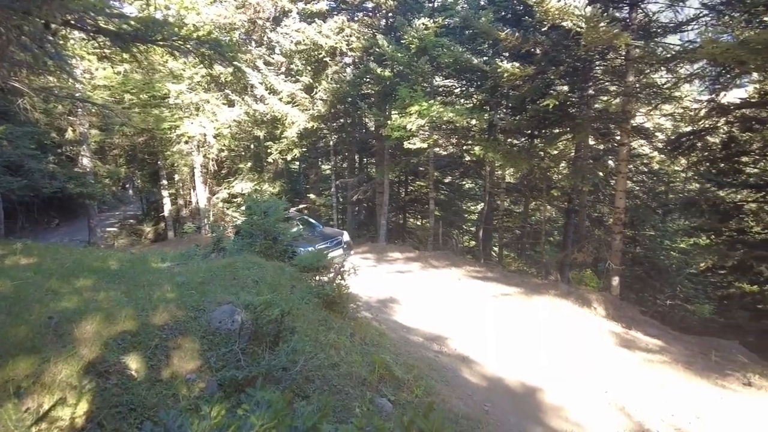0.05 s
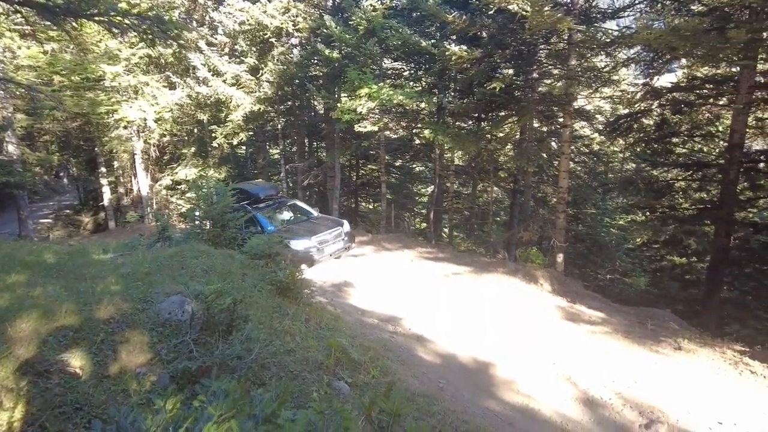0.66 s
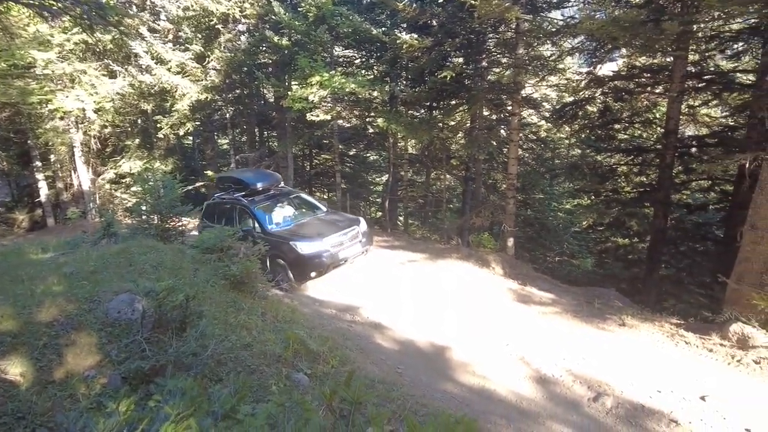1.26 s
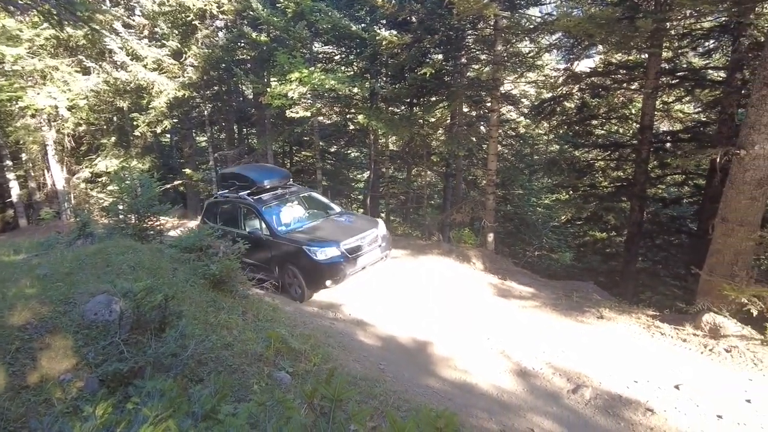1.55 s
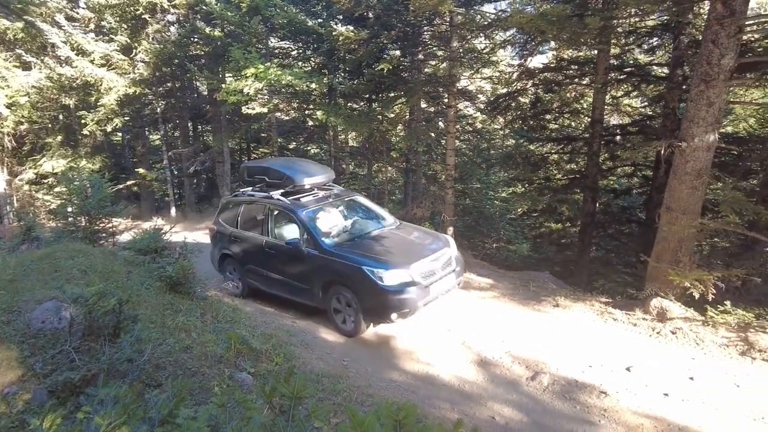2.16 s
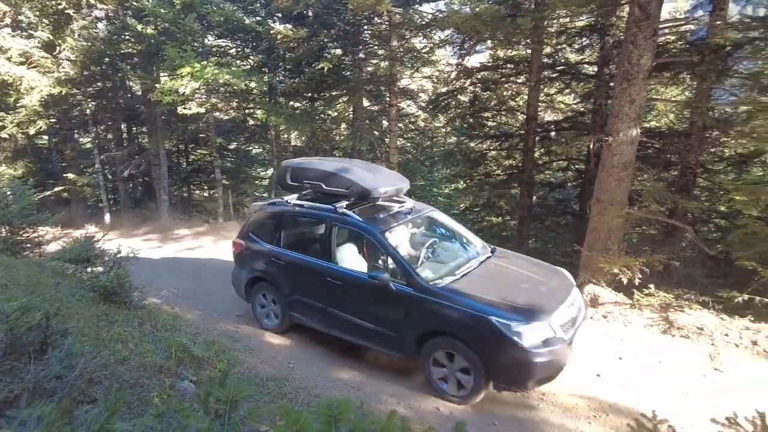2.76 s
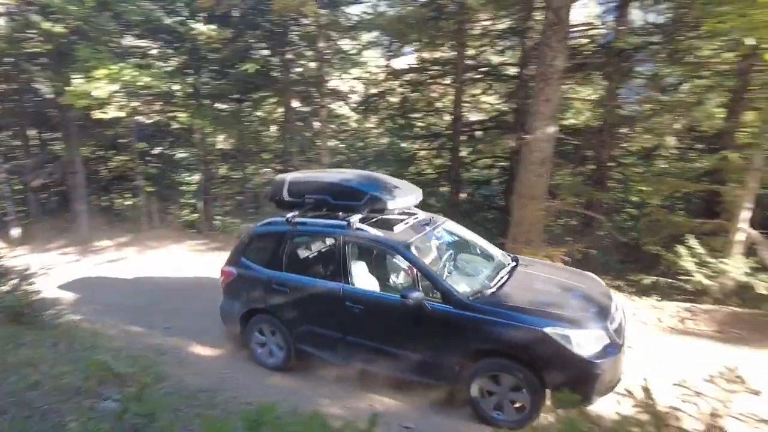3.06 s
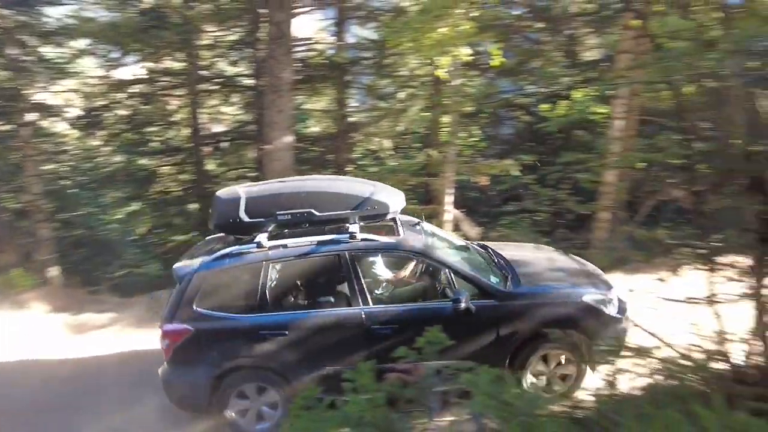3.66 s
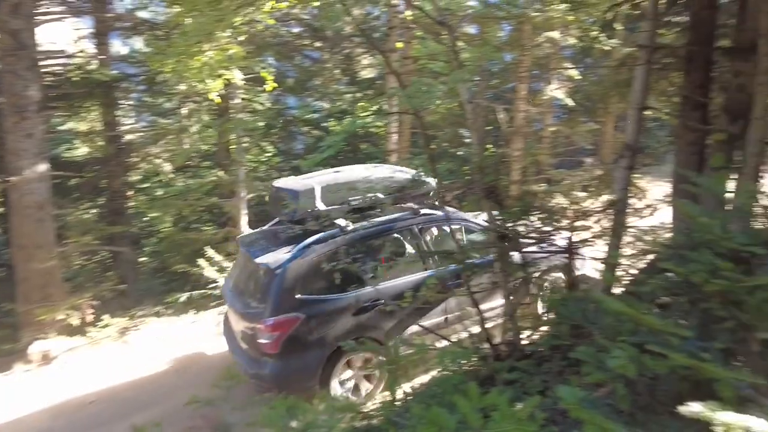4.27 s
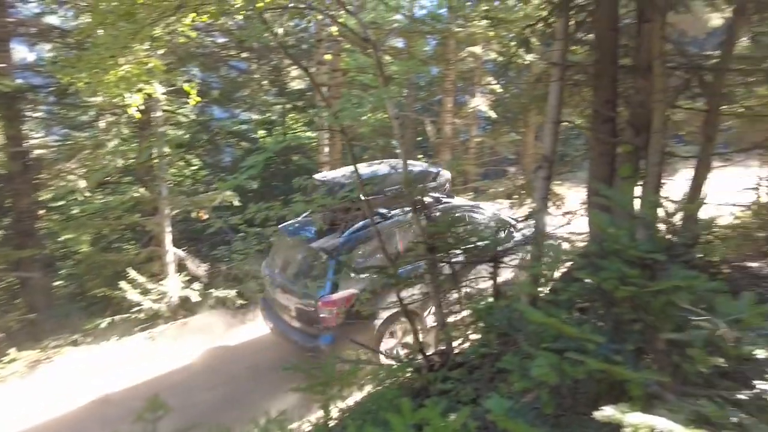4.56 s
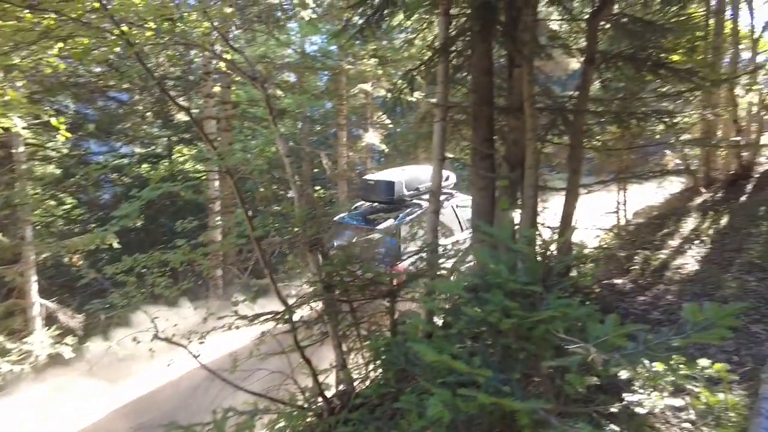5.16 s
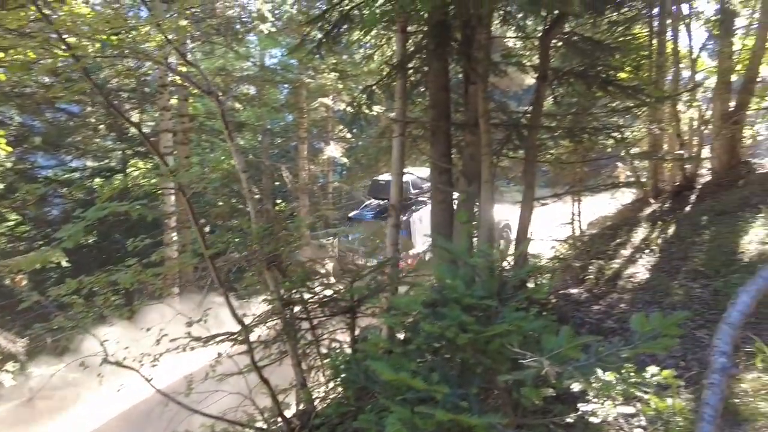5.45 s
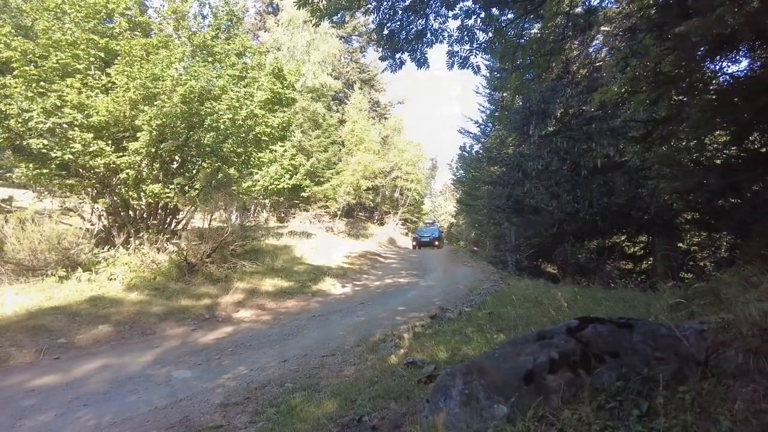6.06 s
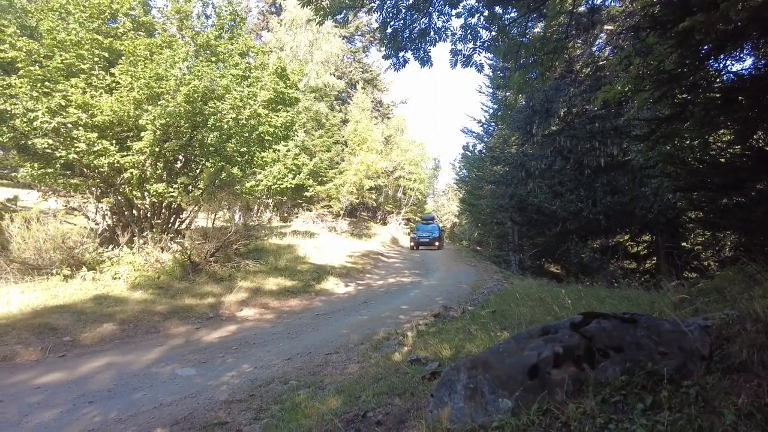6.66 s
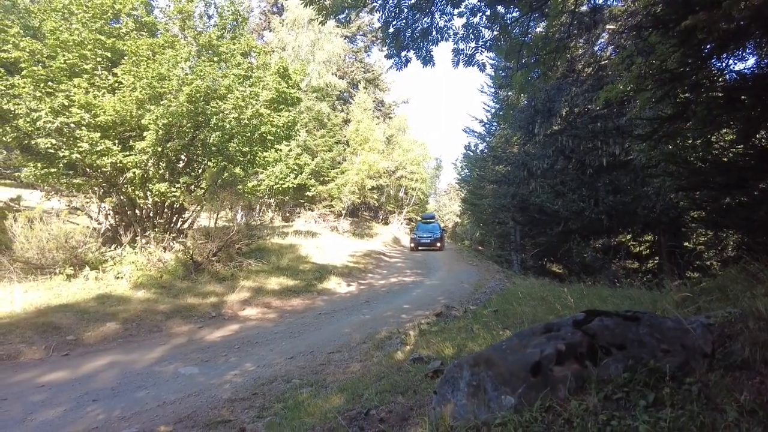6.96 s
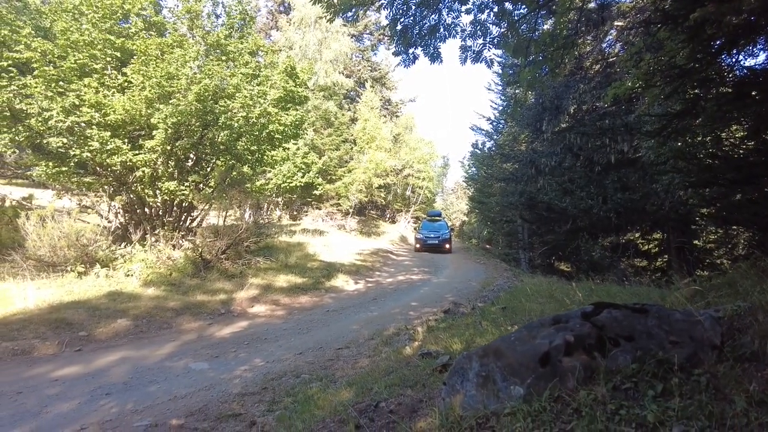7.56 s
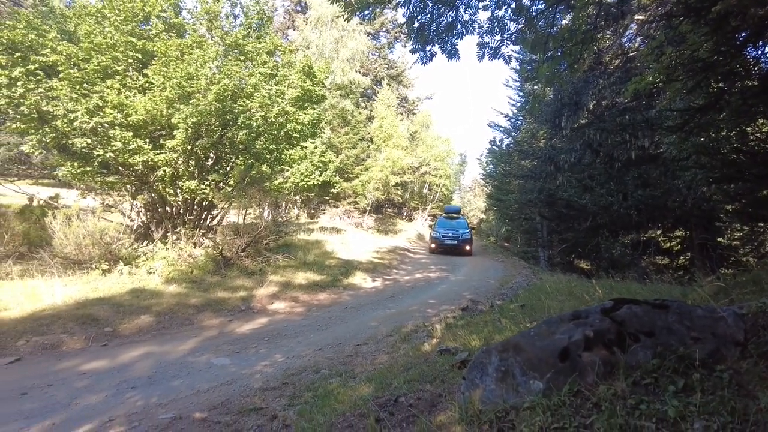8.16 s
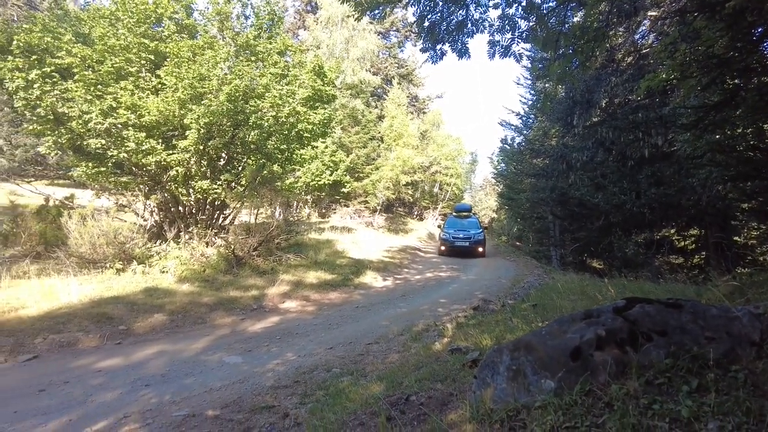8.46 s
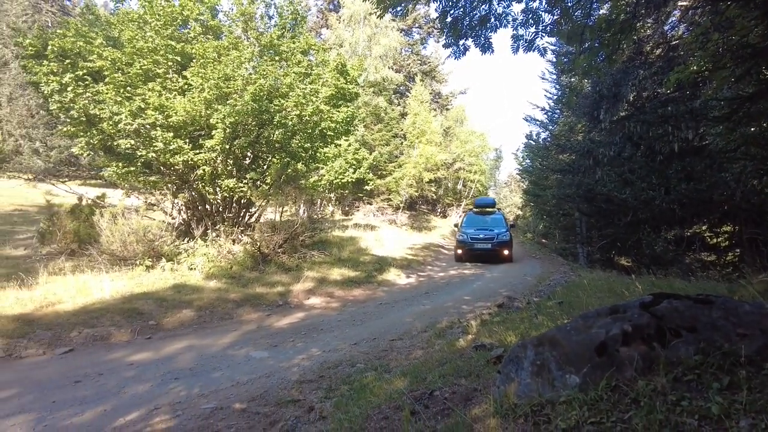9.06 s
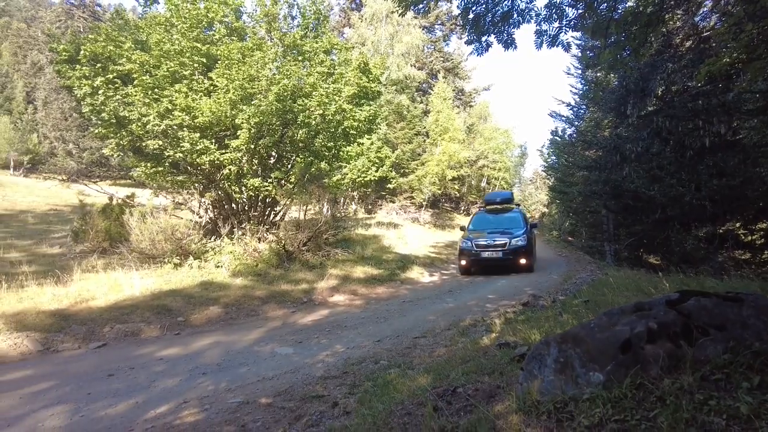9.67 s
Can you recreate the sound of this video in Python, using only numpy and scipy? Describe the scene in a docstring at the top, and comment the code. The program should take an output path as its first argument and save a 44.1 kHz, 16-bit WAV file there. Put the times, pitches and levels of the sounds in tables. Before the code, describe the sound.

Tyres crunch and pop over gravel as a car passes close, engine booming briefly; then birds chirp while a distant car nears.

```python
"""A car crawls up a gravel forest track, its tyres crunching and popping stones loose, its running gear
squeaking faintly, while air rumbles on the microphone. Around 2.7 s the four-cylinder engine sags and the
exhaust booms with a sizzle of overload; the car passes at 3.75 s and sags again. From about 5.4 s the
scene dissolves to the car far off, humming and crackling as it slowly comes nearer. Small birds call
between 6 and 8.4 s."""
import sys
import numpy as np
from scipy import signal
from scipy.fft import rfft, irfft, next_fast_len
from scipy.io import wavfile
from scipy.ndimage import uniform_filter1d, minimum_filter1d

SR = 44100
rng = np.random.default_rng(int(sys.argv[2]) if len(sys.argv) > 2 else 0)


def dump_mix(stems):
    """Bounce the given channels to the path in sys.argv[1] as a 16-bit WAV at rate SR."""
    frames = np.atleast_2d(stems).T  # one column per channel
    limited = np.clip(frames, -1, 1)  # hard clip at full scale
    pcm = np.round(limited * 32767).astype(np.int16)
    wavfile.write(sys.argv[1], SR, pcm)


N = 433062
TIME = np.arange(N) / SR


def from_db(db):
    """Decibels to gain."""
    return 10 ** (np.asarray(db) / 20)


def rms_one(x):
    """Scales to rms 1."""
    return x / np.sqrt(np.mean(x ** 2) + 1e-20)


def curves(rows):
    """One curve over time for each column after the first, which holds the seconds."""
    times, *columns = np.transpose(rows)
    return [np.interp(TIME, times, column) for column in columns]


def swells(rows):
    """Smooth humps in dB from rows of middle in seconds, length in seconds and height in dB."""
    return sum(db * np.cos(np.pi * np.clip((TIME - s) / length, -.5, .5)) ** 2 for s, length, db in rows)


def at_hz(points, hz):
    """Reads a spectrum on a log-frequency axis."""
    f, value = np.transpose(points)
    return np.interp(np.log(hz + 1e-9), np.log(f), value)


def band(x, low_hz, high_hz):
    """A gentle band-pass."""
    sos = signal.butter(2, [low_hz, min(high_hz, .45 * SR)], "band", fs=SR, output="sos")
    return signal.sosfilt(sos, x + 1e-18)


def colour(x, peaks):
    """A chain of resonant peaks and dips."""
    for hz, width, db in peaks:
        x = x + (from_db(db) - 1) * signal.lfilter(*signal.iirpeak(hz, hz / width, fs=SR), x)
    return x


def drift(rate_hz):
    """A smooth random wander of rms about 1."""
    r = np.exp(-80 * np.pi * rate_hz / SR)
    slow = signal.lfilter([1], [1, -2 * r, r * r], rng.standard_normal(N // 40 + 2002))[2000:]
    return np.interp(np.arange(N) / 40, np.arange(len(slow)), rms_one(slow))


def noise(spectrum):
    """Noise of rms 1 with this spectrum."""
    size = next_fast_len(N, True)
    gain = from_db(at_hz(spectrum, np.fft.rfftfreq(size, 1 / SR)))
    return rms_one(irfft(rfft(rng.standard_normal(size)) * gain, size)[:N])


def whistle(hz, db):
    """A tone that follows the pitches hz, swelling and fading once."""
    u = np.linspace(0, 1, len(hz))
    return from_db(db) * 2 * np.sqrt(u * (1 - u)) * np.sin(2 * np.pi * np.cumsum(hz) / SR)


def contacts(per_s, spread_db, clump_db):
    """Random impulses: many small, few large, arriving in clumps."""
    hits = rng.random(N) < per_s * from_db(clump_db * drift(18)) / SR
    return rms_one(hits * from_db(spread_db * np.minimum(rng.exponential(1, N), 4.5)))


def stereo(mid, side, alike):
    """Two unrelated sounds mixed into a pair with this left-right likeness."""
    return np.sqrt((1 + alike) / 2) * mid + np.sqrt((1 - alike) / 2) * side * np.array([[1], [-1]])


def add(out, s, sound):
    """Mixes a sound in at time s."""
    start = int(s * SR)
    out[..., start:start + sound.shape[-1]] += sound[..., :N - start]


def forest(x, t60, wet_db):
    """Trunks scatter a sound into a thin tail, different on each side."""
    t = TIME[:SR]
    echoes = rng.standard_normal((2, SR)) * (rng.random((2, SR)) < .05)
    echoes *= from_db(-60 * t / t60) * (t > .004)
    echoes /= np.sqrt(np.sum(echoes ** 2, axis=1, keepdims=True))
    return x + from_db(wet_db) * signal.fftconvolve(x[None], echoes, axes=1)[:, :N]


# The car's path: a close pass, then a dissolve to an approach from far away.
CLOSEST_S, CLOSEST_M, PASS_M_PER_S = 3.75, 4.08, 2.88
DISSOLVE_S, DISSOLVE_LENGTH_S = 5.44, 0.58
FAR_M, APPROACH_M_PER_S = 34.3, 5.8


def far_share():
    """0 during the pass, 1 after the dissolve."""
    return np.clip((TIME - DISSOLVE_S) / DISSOLVE_LENGTH_S, 0, 1)


def rear_share():
    """Rises from near 0 to near 1 as the passing car turns its tail to the listener, and stays there."""
    along_m = PASS_M_PER_S * (TIME - CLOSEST_S)
    return .5 + .5 * along_m / np.hypot(CLOSEST_M, along_m)


def nearness_db():
    """The level falls with distance; 0 dB at the closest point."""
    passing_m = np.hypot(CLOSEST_M, PASS_M_PER_S * (TIME - CLOSEST_S))
    far_m = np.maximum(FAR_M - APPROACH_M_PER_S * (TIME - DISSOLVE_S), CLOSEST_M)
    far = far_share()
    return 20 * np.log10(CLOSEST_M * ((1 - far) / passing_m + far / far_m))


# Low rumble of air on the microphone. Each row: frequency in Hz, relative density in dB.
AIR_SPECTRUM = [(10, -31), (18, 1), (26, 3), (38, 0), (55, -11), (80, -33), (160, -72)]
# Gusts. Each row: middle and length in seconds, rumble boost in dB.
GUSTS = [(.6, 0.35, 5.5), (2.57, 0.22, 6), (2.78, 0.23, 4), (3.23, 0.13, 6), (3.87, 0.13, 6.5),
         (4.09, 0.29, 4.5), (8.35, 0.43, 5), (9.78, 0.19, 3)]


def air_rumble(near_db, level_db=-9.5, far_db=-3.5, follows=0.71, evenness=0.51):
    """Air rumbles on the microphone in gusts, a little more on the right; its level rides the pass."""
    buffeting = noise(AIR_SPECTRUM)
    envelope = np.sqrt(uniform_filter1d(buffeting ** 2, SR // 8) + 1e-6)
    db = level_db + follows * near_db + far_db * far_share() + swells(GUSTS)
    balance_db = np.array([[-1.1], [1.0]])
    return from_db(db + balance_db) * rms_one(buffeting / envelope ** evenness)


# Bird notes. Each row: start and length in seconds, first, middle and last pitch in Hz, level in dB.
BIRD_NOTES = [(6.072, 0.17, 5180, 4720, 4700, -48), (6.582, 0.095, 4600, 4830, 5070, -50.5),
              (7.065, 0.081, 4200, 4090, 3960, -41.5), (7.354, 0.14, 4970, 4670, 5000, -36),
              (7.484, 0.14, 7100, 7900, 7850, -53), (7.649, 0.09, 4150, 4130, 3950, -34.5),
              (7.693, 0.098, 8100, 7760, 7700, -47), (7.891, .1, 7300, 7440, 7710, -52),
              (8.074, 0.093, 7650, 7460, 7650, -46), (8.25, 0.13, 7400, 7340, 7700, -52)]


def birds():
    """Thin whistles that bend through three pitches and echo among the trees; high ones quaver most."""
    out, wobble = np.zeros(N), drift(43)
    for s, length, first, middle, last, db in BIRD_NOTES:
        u = np.linspace(0, 1, int(length * SR))
        hz = np.polyval(np.polyfit([0, .5, 1], [first, middle, last], 2), u)
        quaver = np.interp(middle, [4500, 7500], [.0035, .013]) * wobble[int(s * SR):][:len(u)]
        add(out, s, whistle(hz * (1 + quaver), db))
    return forest(out, t60=1.1, wet_db=-1.0)


# The distant engine's hum. Each row: pitch in Hz, relative level in dB.
HUM_LINES = [(124, -13), (153, -15.5), (215, -11.5), (275, -17.5)]


def far_engine(level_db, width_hz=3.6):
    """Many paths through the trees blur the engine's lines into narrow, fading bands."""
    hum = np.zeros(N)
    for hz, db in HUM_LINES:
        phase = 2 * np.pi * hz * TIME
        hum += from_db(db) * (drift(width_hz) * np.sin(phase) + drift(width_hz) * np.cos(phase))
    return far_share() * from_db(level_db) * hum


# Running-gear squeaks. Each row: start and length in seconds, pitch in Hz, relative level in dB.
GEAR_SQUEAKS = [(0.565, .09, 3000, -31), (0.724, 0.09, 3020, -33), (.95, 0.55, 2460, -36),
                (1.252, 0.38, 3130, -37), (1.43, .16, 2960, -34), (1.775, 0.1, 2575, -28.5),
                (2.226, .08, 4250, -38), (2.41, .08, 4280, -33), (2.85, 0.073, 2550, -31),
                (2.83, 0.5, 3020, -30.5), (3.45, 0.4, 2980, -31.5), (4.1, 0.3, 2970, -35.5)]


def squeaks(level_db=-1.5, quaver=0.0065, flutter_db=3.5):
    """Rubbing parts sing briefly at an unsteady pitch, catching and letting go."""
    out, wobble = np.zeros(N), 1 + quaver * drift(80)
    for s, length, hz, db in GEAR_SQUEAKS:
        add(out, s, whistle(hz * wobble[int(s * SR):][:int(length * SR)], db + level_db))
    flutter = rms_one(from_db(flutter_db * drift(25)))
    return forest(out * flutter, t60=0.23, wet_db=-9.0)


# Bursts of fizz. Each row: start, rise and 60 dB decay in seconds, low and high edge in Hz,
# relative level in dB.
FIZZ_BURSTS = [(2.635, .03, .22, 12500, 15000, -30), (2.715, .045, .33, 5500, 15500, -26),
               (2.87, .04, .7, 9000, 15000, -37.5), (3.29, .07, .6, 11000, 14500, -36.5),
               (3.96, .035, .3, 6000, 12000, -37), (4.491, .002, .09, 4000, 10500, -26),
               (4.69, .015, .15, 11000, 15500, -40), (5.12, .015, .15, 6500, 11000, -44)]


def fizz(level_db=-1.0):
    """Short bursts of bright fizz; the strongest is overload sizzle during the exhaust boom."""
    out, t = np.zeros((2, N)), TIME[:SR // 2]
    grains = contacts(per_s=2000, spread_db=1.5, clump_db=1.0) * rng.standard_normal((2, N))
    for s, rise, t60, low_hz, high_hz, db in FIZZ_BURSTS:
        burst = rms_one(band(grains[:, int(s * SR):][:, :len(t)], low_hz, high_hz))
        envelope = np.minimum(t / rise, 1) * from_db(-60 * np.maximum(t - rise, 0) / t60)
        add(out, s, from_db(db + level_db) * envelope * burst)
    return out


def suspension_thud(start_s=3.158, hz=222, level_db=4, t60=0.11):
    """A wheel drops and the suspension rings once, low and quickly dying."""
    t = np.maximum(TIME - start_s, 0)
    return from_db(level_db - 60 * np.minimum(t / t60, 10)) * np.sin(2 * np.pi * hz * t)


# Tyre roar, close by and far off. Each row: frequency in Hz, relative density in dB.
NEAR_ROAR_SPECTRUM = [(45, -12), (65, 9), (105, 0), (160, -1), (240, -4.5), (300, -14), (380, -23),
                      (520, -66.5)]
FAR_ROAR_SPECTRUM = [(45, -10), (70, 8), (100, 4), (150, 1), (220, -3), (285, -6), (335, -16), (520, -43.5)]


def tyre_roar(level_db, far_db=1.8, behind_db=0.8):
    """The tyre carcasses drum on the uneven ground, slightly louder from behind."""
    near, far = (stereo(noise(spectrum), noise(spectrum), alike=0.92)
                 for spectrum in (NEAR_ROAR_SPECTRUM, FAR_ROAR_SPECTRUM))
    near *= (1 - far_share()) * from_db(behind_db * rear_share())
    far *= far_share() * from_db(far_db)
    return from_db(level_db) * (near + far)


def flung_grit(level_db):
    """Close by, grit thrown from the tread ticks brightly against the wheel arches."""
    hits = contacts(per_s=260, spread_db=3.0, clump_db=4.0) * rng.choice([-1, 1], N)
    ticks = rms_one(band(hits, low_hz=4500, high_hz=14000))
    return forest((1 - far_share()) * from_db(level_db) * ticks, t60=.04, wet_db=2.5)


def breaking_grit(x, bright_db):
    """The colour of breaking grit: a dull body and, the sharper the break, a brighter edge."""
    burst = signal.sosfilt(signal.butter(6, [700, 6200], "band", fs=SR, output="sos"), x + 1e-18)
    body = signal.lfilter(*signal.butter(2, 3000, fs=SR), burst)
    return body + from_db(bright_db) * (burst - body)


def far_crackle(level_db):
    """On the track far away, small grit keeps cracking under the tread."""
    hits = contacts(per_s=140, spread_db=3.5, clump_db=2.5)
    ticks = rms_one(breaking_grit(hits, bright_db=-24.0))
    return forest(far_share() * from_db(level_db) * ticks, t60=0.23, wet_db=3.0)


# Grit snapping. Each row: start in seconds, dry peak in dB, bright edge in dB, ring in Hz.
GRIT_SNAPS = [(2.0103, -14, -12, 2200), (2.8194, -10, -17, 2000), (3.6528, -9, -12, 3000),
              (3.973, -8, -16, 2800), (4.4919, -12, -6, 1400), (4.779, -14, -25, 1400),
              (5.439, -15, -30, 1300), (7.7504, -17, -10, 3000), (7.928, -21, -12, 3000),
              (8.349, -12.5, -2, 3800), (8.386, -17, -7, 2400), (8.6658, -14.5, -4, 2000),
              (8.7655, -15, -5, 1600), (8.9003, -16, -6, 1600), (8.9518, -7.5, -9, 1600),
              (9.004, -15, -9, 1600), (9.1125, -12.5, -2, 1400), (9.118, -12, -6, 1350),
              (9.151, -13.5, -2, 1400), (9.1783, -17, -1, 1600), (9.229, -18, -10, 1570),
              (9.337, -12.5, -3, 1600), (9.486, -12, -18, 1400), (9.5183, -13, -12, 2200),
              (9.5984, -14, -1, 2600), (9.6672, -16, -12, 1600)]


def grit_snaps(t60=0.014, crumble_db=-19.0, ring_db=9.0, ring_q=2.5):
    """Grit breaks with one sharp click and a short crumbling; the piece rings for a few cycles."""
    out, t = np.zeros(N), TIME[:SR // 20]
    click = t == 0
    for s, db, bright_db, hz in GRIT_SNAPS:
        crumble = rng.standard_normal(len(t)) * from_db(crumble_db - 60 * t / t60)
        snap = colour(breaking_grit(click + crumble, bright_db), [(hz, hz / ring_q, ring_db)])
        add(out, s, from_db(db) * snap / np.abs(snap).max())
    return forest(out, t60=0.16, wet_db=-7.0)


# Stones popping loose. Each row: start in seconds, dry peak in dB, ring in Hz.
STONE_KNOCKS = [(0.363, -10.5, 800), (0.606, -7, 750), (0.611, -6, 835), (1.179, -3, 680), (1.327, -2, 744),
                (1.337, -0.5, 760), (1.794, -3, 750), (1.884, -7, 840), (1.963, -2, 780), (2.0105, 2, 1140),
                (2.081, -5, 1000), (2.531, 2, 670), (2.636, -4, 700), (2.669, -7, 802), (2.996, -10, 730),
                (3.145, -7.5, 890), (3.221, -7, 620), (3.507, -1.5, 870), (3.788, -4.5, 746),
                (4.039, -10, 620), (4.109, -7, 1170), (4.337, -8, 670), (4.482, -8, 900), (4.487, -8, 760),
                (4.621, -12, 720), (4.952, -16, 597), (5.082, -15, 950), (5.092, -15, 1000),
                (5.206, -12.5, 760), (5.214, -11.5, 780), (5.394, -16, 620), (5.717, -19, 565),
                (6.108, -16, 546), (6.533, -22, 1250), (6.7, -21, 589), (6.819, -20, 1200),
                (7.025, -20, 571), (7.152, -14, 1400), (7.367, -19, 581), (7.663, -20, 1080),
                (7.989, -21, 643), (8.326, -11, 560), (8.498, -15.5, 640), (8.655, -15, 1136),
                (8.829, -17, 661), (9.484, -13, 1250), (9.598, -10, 780)]
# A knock's modes. Each row: multiple of the ring pitch, relative level in dB, base t60 in seconds.
STONE_MODES = [(.68, -1, .01), (1, 4, .017), (1.35, -1, .008), (1.8, -5, .011), (2.6, -22, .005)]


def stone_knocks(rebound_db=-11.0, rebound_s=.009, scrape_db=-5.5, scrape_t60=0.015, linger=0.5):
    """A stone squeezed from under a tyre knocks hollowly, scrapes and rebounds."""
    out, t = np.zeros(N), TIME[:SR // 10]
    for s, db, hz in STONE_KNOCKS:
        stretch = 1 + linger * rear_share()[int(s * SR)]   # the ring lingers once the car is past
        for delay, drop_db in ((0, 0), (rebound_s * rng.uniform(0.473, 1.5), rebound_db)):
            knock = np.zeros(len(t))
            for ratio, mode_db, t60 in STONE_MODES:
                envelope = from_db(mode_db + 1.5 * rng.normal() - 60 * t / (t60 * stretch))
                mode_hz = hz * ratio * (1 + 0.05 * rng.normal())
                knock += envelope * np.sin(2 * np.pi * mode_hz * t) * rng.choice([-1, 1])
            scrape = rms_one(band(rng.standard_normal(len(t)), 0.44 * hz, 2.0 * hz))
            knock += from_db(scrape_db - 60 * t / scrape_t60) * scrape
            add(out, s + delay, from_db(db + drop_db) * knock / np.abs(knock).max())
    return forest(out, t60=0.27, wet_db=-8.0)


def pebbles(level_db, low_hz, high_hz, cycles, per_s, spread_db):
    """Loose stones click together at random, each ringing at a pitch of its own."""
    pitches = np.geomspace(low_hz, high_hz, num=24)
    hits = contacts(per_s, spread_db, clump_db=4.0)
    pitch_index = rng.integers(0, len(pitches), N)
    out = np.zeros(N)
    for k, hz in enumerate(pitches):
        r, w = from_db(-60 * hz / (cycles * SR)), 2 * np.pi * hz / SR   # 60 dB down after `cycles`
        strikes = hits * (pitch_index == k) + 1e-18
        out += signal.lfilter([0, np.sin(w)], [1, -2 * r * np.cos(w), r * r], strikes)
    return forest(from_db(level_db) * rms_one(out), t60=0.11, wet_db=-2.5)


# Main gravel tone, tinted one way on approach and another once past.
# Each row: frequency in Hz, relative density in dB.
MAIN_TONE = [(210, -34), (350, -4.5), (613, 0), (720, -1.5), (914, -7), (1120, -12), (1880, -16.5),
             (2980, -15.5), (3390, -20), (6130, -29), (10100, -30.5), (13000, -28), (16000, -37)]
APPROACH_TINT = [(210, -29), (350, 3.5), (522, -20), (664, -10.5), (885, -6.5), (1240, -3), (1450, -8.5),
                 (1850, -12.5), (2270, -17), (3030, -13), (3560, -18), (6030, -23.5), (10100, -29),
                 (15000, -28.5), (16000, -40)]
PAST_TINT = [(210, -37), (350, -5), (400, 7), (514, 3), (664, -15), (1020, -4.8), (1550, -5), (2270, -35),
             (2940, -13), (3620, -16.5), (6130, -18), (6970, -22.5), (11600, -21), (13400, -40),
             (16000, -46)]
# Their blend. Each row: time in seconds, position (0 approach tint, 1 main tone, 2 past tint).
TONE_BLEND = [(3.8, 0.64), (4.5, 1.04), (5.55, 1.26), (6.05, 1.2)]
# The gravel's stereo width. Each row: frequency in Hz, left-right likeness (1 is mono).
GRAVEL_LIKENESS = [(300, 1), (600, 0.71), (1200, 0.72), (2500, 0.88), (5000, 0.16), (8500, 0.22),
                   (13000, 0.54)]


def gravel(crunch_db, hiss_db, low_grain=0.36, high_grain=0.084, dust_grain=0.056, patchy_db=1.0):
    """Each stone contact excites every band with a strength of its own, over a smooth wash of sand."""
    edges = np.geomspace(330, 16500, 18)
    centres, widths = np.sqrt(edges[1:] * edges[:-1]), np.diff(edges)
    fine = np.clip(np.log2(centres / 1600), 0, 1)   # 0 = coarse stones, 1 = sand
    blend, tones = curves(TONE_BLEND)[0], []
    for spectrum in (APPROACH_TINT, MAIN_TONE, PAST_TINT):
        power = from_db(at_hz(spectrum, centres)) ** 2 * widths
        coarse_rms, fine_rms = np.sqrt(power[1:8].sum()), np.sqrt(power[9:].sum())
        tones.append(np.sqrt(power) / (coarse_rms ** (1 - fine) * fine_rms ** fine))
    hits = contacts(per_s=600, spread_db=2.0, clump_db=4.0)
    out = np.zeros((2, N))
    for k, hz in enumerate(centres):
        grain = at_hz([(800, low_grain), (4500, high_grain), (9000, dust_grain)], hz)
        strength = np.sqrt(1 - grain + grain * hits ** 2)   # grain is the contacts' share of the power
        mid, side = band(strength * rng.standard_normal((2, N), dtype=np.float32), *edges[k:k + 2])
        db = crunch_db * (1 - fine[k]) + hiss_db * fine[k] + patchy_db * drift(20.5)
        gain = np.interp(blend, [0, 1, 2], [tone[k] for tone in tones])
        out += from_db(db) * gain * rms_one(stereo(mid, side, at_hz(GRAVEL_LIKENESS, hz)))
    return out


# Faders for the gravel layers. Each row: time in seconds, crunch and sand hiss as relative levels in dB.
GRAVEL_FADERS = [(0.0, -30.5, -37.5), (0.22, -30.5, -37), (1.42, -24.5, -32.5), (1.94, -21, -32.5),
                 (2.24, -23.5, -31), (2.6, -21.5, -34.5), (3.01, -23, -30), (3.2, -20, -29.5),
                 (3.66, -22, -29), (4.67, -27, -38.5), (4.95, -28, -42), (5.52, -29.5, -41.5),
                 (5.85, -39, -47.5), (6.86, -35, -50), (7.71, -33, -46), (7.99, -34, -44.5),
                 (8.83, -31, -44), (9.82, -28, -36.5)]
# EQ on the crunch: its own resonances, the long path through foliage, and the sound ahead of the car.
# Each row: centre in Hz, width in Hz, gain in dB.
CRUNCH_EQ = [(683, 38, 2.5), (1270, 220, 3.5), (1756, 250, 3.5), (2550, 32, 2.5), (2980, 64, 4),
             (3050, 80, 1.5), (4240, 260, 3.5), (5940, 950, 5), (7850, 190, 3.5)]
FOLIAGE_EQ = [(790, 210, -4.5), (1500, 500, 4), (2200, 380, 0.5), (4700, 900, 3.5), (9300, 16300, -4),
              (13100, 5100, -5.5)]
AHEAD_EQ = [(400, 115, 4.5), (1870, 210, 3), (2200, 198, -1), (2580, 25, 3.5), (3120, 37, 3.5),
            (3280, 130, 2), (3550, 630, -2.5)]


def tyres(roar_db):
    """Rolling tyres drum on the track, grind its stones together and throw grit."""
    crunch_db, hiss_db = curves(GRAVEL_FADERS)
    stones = pebbles(crunch_db - 8.0, low_hz=474, high_hz=1520, cycles=9.3, per_s=100, spread_db=2.8)
    chips = pebbles(hiss_db - 10.5, low_hz=1692, high_hz=4600, cycles=86, per_s=170, spread_db=1.5)
    crunch = gravel(crunch_db, hiss_db + 3.5) + stones + chips + flung_grit(hiss_db - 18.5)
    crunch = colour(crunch, CRUNCH_EQ)
    foliage_tint = far_share() * (colour(crunch, FOLIAGE_EQ) - crunch)
    ahead_tint = (1 - rear_share()) ** 2 * (colour(crunch, AHEAD_EQ) - crunch)
    rolling = tyre_roar(roar_db) + crunch + foliage_tint + ahead_tint + far_crackle(crunch_db - 13.5)
    return rolling + stone_knocks() + grit_snaps()


def exhaust_boom_db(hz, resonance_hz=123.8, width_hz=14.2, peak_db=8):
    """The exhaust booms when the sagging engine's second order falls into its resonance."""
    return peak_db / (1 + (2 * (hz - resonance_hz) / width_hz) ** 2)


# Engine speed. Each row: time in seconds, firings per second.
FIRING_RATE = [(0.0, 70.3), (1.0, 71.8), (1.9, 70.4), (2.25, 67.8), (2.4, 65.8), (2.55, 62.3), (2.68, 60.2),
               (2.8, 62.3), (3.0, 69.8), (3.15, 71.5), (3.8, 72.6), (4.0, 68.5), (4.25, 64.3), (4.5, 62.1),
               (4.7, 62.2), (5.0, 65.0), (5.3, 65.7), (6.2, 64.8)]
# Firing orders. Each row: multiple of the firing rate, relative level in dB from the front, from behind.
FIRING_ORDERS = [(1, -20.5, -21), (2, -18.5, -13), (3, -22.5, -27.5), (4, -17.5, -29)]
# Lines from unequal cylinders. Each row: multiple of the firing rate, relative level in dB.
UNEVEN_LINES = [(1.75, -4), (2.5, -5), (2.75, -0.5), (3.25, 1), (3.75, 0), (4.5, -4), (4.75, -3),
                (6, -10.5)]
# Single engine tones boom and fade as the car passes; the uneven lines dip as the throttle is eased.
# Each row: middle and length in seconds, gain in dB.
SWELLS_BY_ORDER = {1: [(2.8, 0.91, 17), (4.05, 0.79, 6)], 2: [(2.88, 0.36, 6), (3.35, 0.55, -7.5),
                   (4.75, 1, 2.5)], 3: [(3.06, 0.44, 14.5)], 4: [(1.98, 0.91, -15), (2.37, 0.38, 5),
                   (3.35, 0.89, -9.5), (4.2, 0.52, 3.5), (4.72, 0.55, 9.5)]}
COASTING_DIP = [(2.6, 1, -4)]


def engine(jitter=0.0019, uneven_front_db=-21.7, uneven_behind_db=-35, uneven_waver_db=3.0, fade_s=.089):
    """Four firing orders through the exhaust, and weaker quarter orders because the cylinders differ."""
    firing_hz = curves(FIRING_RATE)[0] * (1 + jitter * drift(7.5))
    phase = 2 * np.pi * np.cumsum(firing_hz) / SR
    out, rear = np.zeros(N), rear_share()
    for order, front_db, behind_db in FIRING_ORDERS:
        db = front_db + (behind_db - front_db) * rear
        db += exhaust_boom_db(order * firing_hz) + swells(SWELLS_BY_ORDER[order])
        waver_db = 2.5 if order > 2 else 1.0
        out += from_db(db + waver_db * drift(10.0)) * np.sin(order * phase)
    uneven_db = uneven_front_db + (uneven_behind_db - uneven_front_db) * rear + swells(COASTING_DIP)
    for multiple, db in UNEVEN_LINES:
        gain = from_db(uneven_db + db + uneven_waver_db * drift(8.8))
        out += gain * np.sin(multiple * phase + rng.uniform(0, 2 * np.pi))
    fade_out = np.clip(1 - (TIME - DISSOLVE_S - DISSOLVE_LENGTH_S) / fade_s, 0, 1)
    return np.sqrt(2) * fade_out * out


# The car's bearing. Each row: time in seconds, lag of the left microphone in milliseconds.
LEFT_LAG = [(0, -0.066), (2.3, -0.043), (3.1, 0.032), (4.7, 0.031), (5.2, -0.056), (5.7, -0.049),
            (6.1, 0.0039), (9.8, 0.065)]


def panned(pair):
    """The nearer microphone hears the car first; the very top is left undelayed."""
    lag, n = curves(LEFT_LAG)[0] * SR / 1000, np.arange(N)
    moved = np.array([np.interp(n - side * lag / 2, n, x) for side, x in zip((1, -1), pair)])
    return pair + signal.sosfiltfilt(signal.butter(6, 11000, fs=SR, output="sos"), moved - pair)


def scene(gust_share=0.43, roar_follows=0.98):
    """The car, the rumbling air and the birds; the roar and far hum swell a little with the gusts."""
    near_db = nearness_db()
    roar_db = roar_follows * near_db + gust_share * swells(GUSTS)
    mix = tyres(roar_db - 14.0) + suspension_thud() + fizz()
    mix += from_db(near_db - 2.5) * engine() + far_engine(roar_db - 15.5)
    mix += squeaks() + air_rumble(near_db)
    return panned(mix) + birds()


# The microphone's treble dips. Each row: centre in Hz, width in Hz, gain in dB.
MICROPHONE_EQ = [(12300, 3300, -6.5), (15300, 2400, -6.5)]


def record(dry, threshold=1.8, cutoff_hz=15900):
    """The microphone dulls the treble, a fast limiter and soft clip hold the peaks, the top is cut."""
    heard = colour(dry, MICROPHONE_EQ)
    limiter_gain = np.minimum(1, threshold / (np.abs(heard).max(axis=0) + 1e-9))
    held = heard * uniform_filter1d(minimum_filter1d(limiter_gain, size=700), size=700)
    rounded = held / (1 + held ** 8) ** (1 / 8)
    return signal.sosfilt(signal.ellip(10, .1, 70, cutoff_hz, fs=SR, output="sos"), rounded)


dry = scene()
out = record(dry)
dump_mix(out)
```